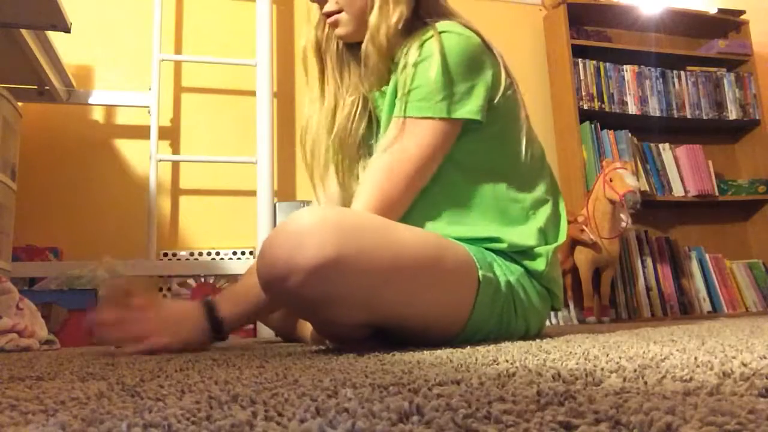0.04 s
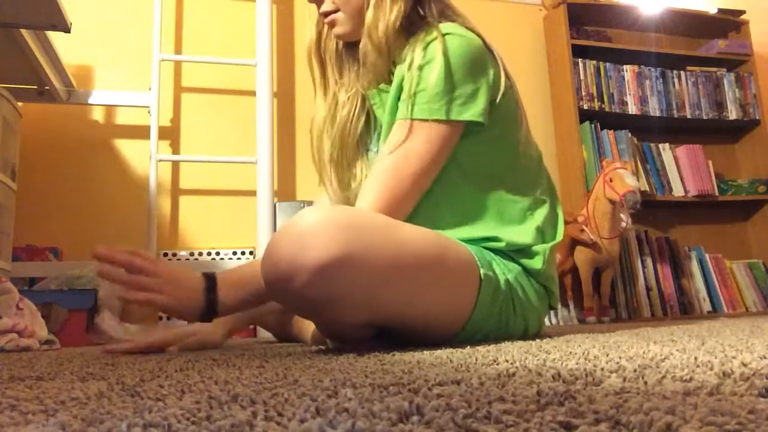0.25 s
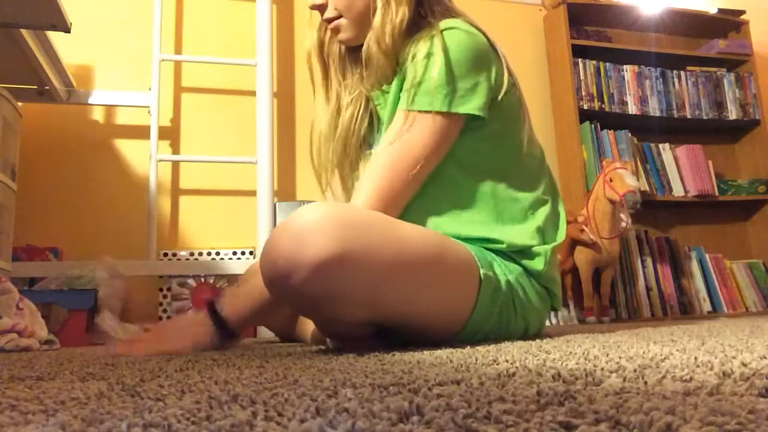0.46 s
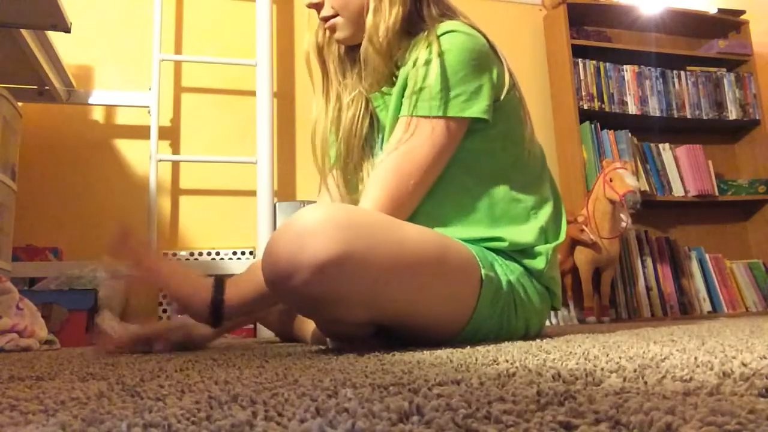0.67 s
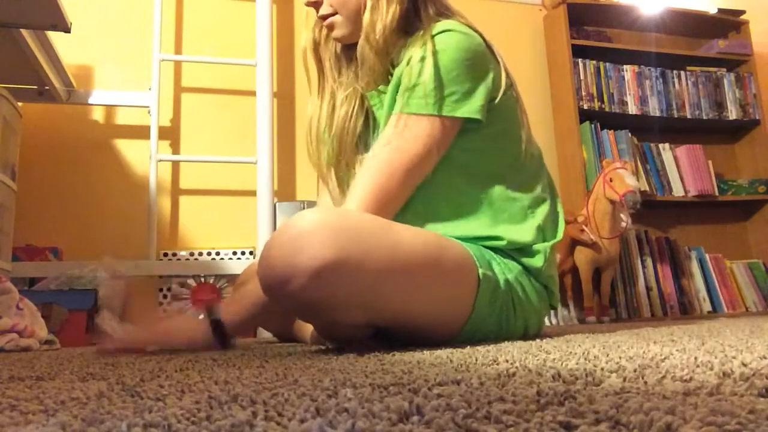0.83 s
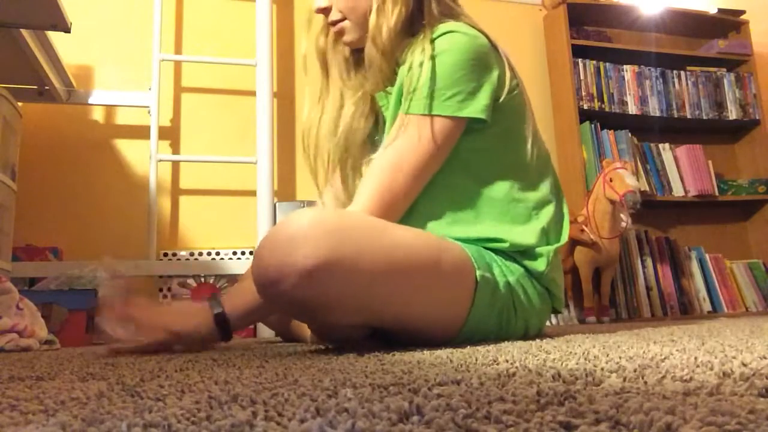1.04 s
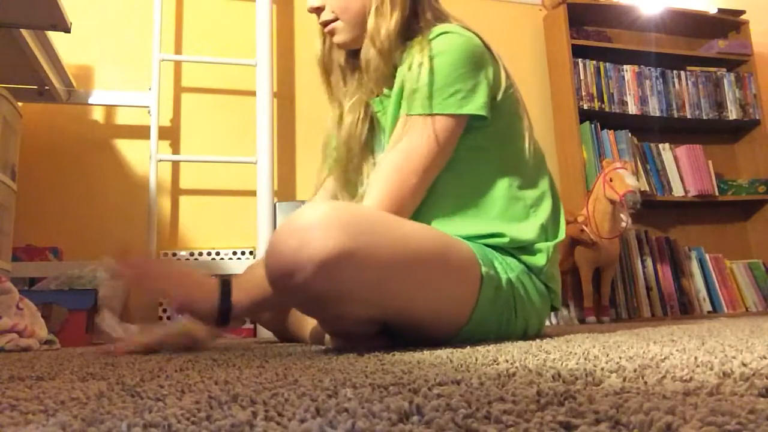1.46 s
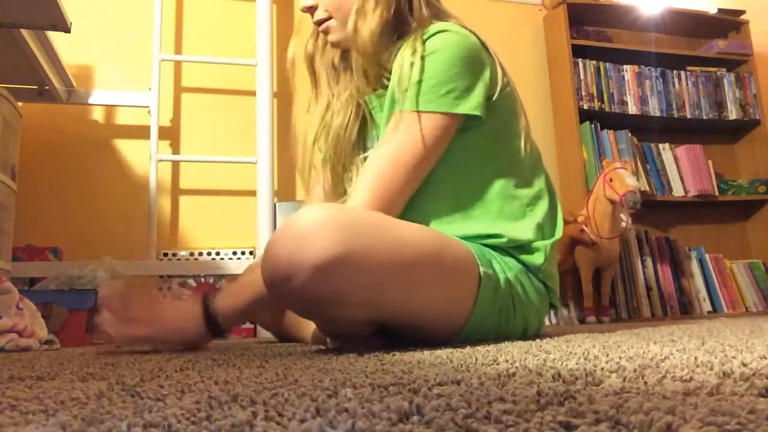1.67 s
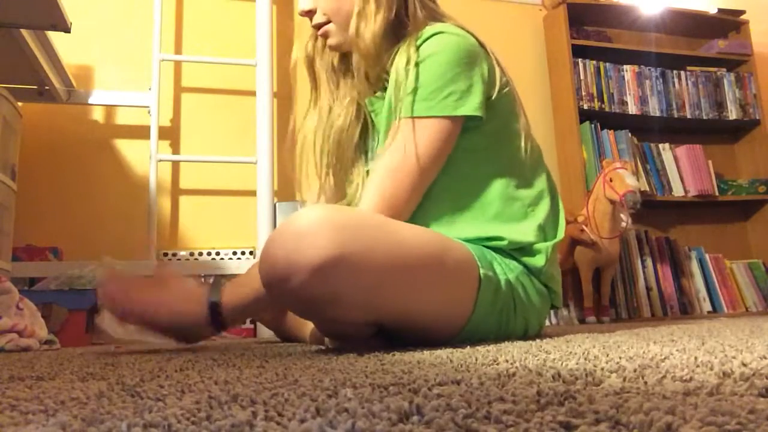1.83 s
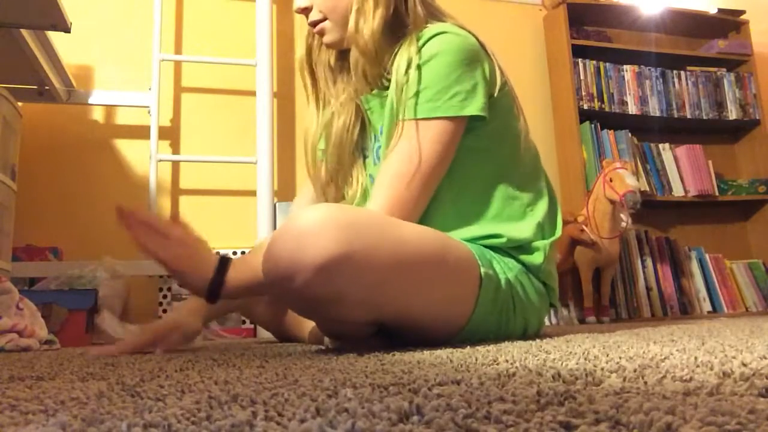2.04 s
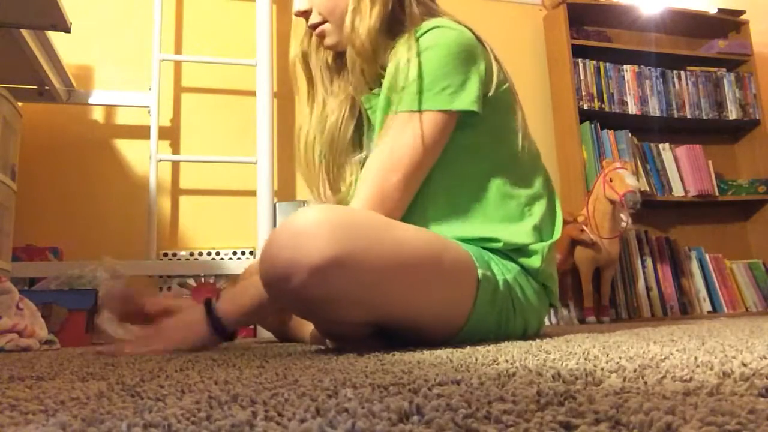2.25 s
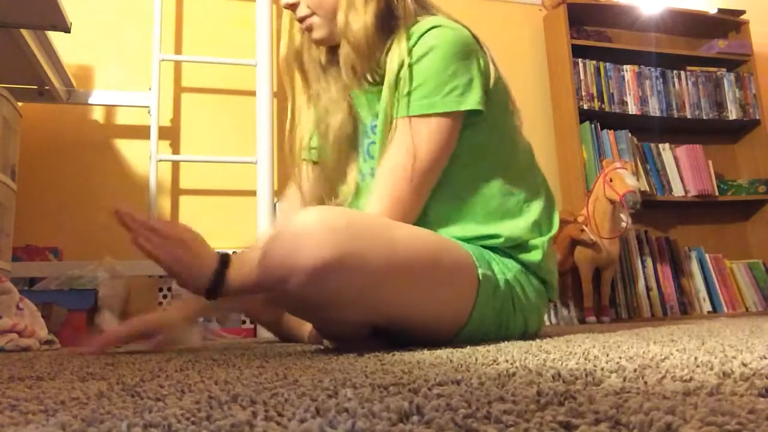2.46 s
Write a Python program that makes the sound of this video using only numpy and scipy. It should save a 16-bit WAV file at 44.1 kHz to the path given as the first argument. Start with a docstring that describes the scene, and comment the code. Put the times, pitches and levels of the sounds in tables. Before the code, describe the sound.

Quick, irregular hand pats thud softly on carpet, heard close up in a small room.

```python
"""Hands patting a carpeted floor

A small bedroom, microphone low down, close to two hands patting the carpet over a wooden floor.
The fingers slap down first, then each palm gives a dull thud, crunches the pile and sets the boards
booming. Walls and ceiling answer with short echoes over a faint room hum."""
import sys
import numpy as np
from scipy import signal
from scipy.fft import rfft, irfft
from scipy.io import wavfile
from scipy.ndimage import uniform_filter1d

SR = 44100
rng = np.random.default_rng(int(sys.argv[2]) if len(sys.argv) > 2 else 0)


def to_wav(sig):
    """Store sig (one row per channel, or 1-D mono) as 16-bit WAV at the path in sys.argv[1].

    Samples outside -1..1 are clipped; the rate is SR.
    """
    pcm = np.clip(np.atleast_2d(sig), -1, 1) * 32767
    pcm = np.round(pcm).astype(np.int16)
    wavfile.write(sys.argv[1], SR, pcm.T)  # frames by channels


N = 114660
T = np.arange(N) / SR

# Noise colours, as relative spectral density: frequency_hz, density_db
HUM_COLOUR = [(15, -31), (25, 1), (90, -3.5), (301, -1.5), (394, -6), (673, -18.5), (833, -21.5),
              (1210, -21.5), (1460, -21), (1670, -26), (2500, -31.5), (3010, -33), (4150, -34), (5570, -36),
              (7480, -34.5), (8550, -39), (15000, -44)]  # room hum
RUMBLE_COLOUR = [(25, -18.5), (45, -5.5), (62, 2), (80, -3), (110, -7.5), (200, -30.5)]  # deep rumble of the house
REVERB_COLOUR = [(40, -10.5), (120, -5.5), (250, -2), (500, 0), (1200, 1.5), (4000, 3), (12000, -1)]  # diffuse decay of the bedroom
CRUNCH_COLOUR = [(900, -19.5), (2000, 3.5), (3000, 0.5), (5000, -3.5), (7200, -1), (9000, -9.5),
                 (15000, -9)]  # pile pressed flat
BRUSH_COLOUR = [(600, -9.5), (1100, 5.5), (2000, 1), (5000, 0), (9000, -2.5), (15000, -5)]  # pile brushed
TICK_COLOUR = [(400, -13.5), (800, 6), (1200, 0.5), (1800, -6.5), (3000, -20.5), (8000, -27)]  # fingertip touching down
SMACK_COLOUR = [(280, -7.5), (370, 5), (520, 1), (700, 1.5), (900, -5), (1200, -7.5), (1500, -15.5),
                (1800, -19), (2400, -31.5), (4000, -52.5)]  # skin of the fingers
# Wall and ceiling reflections: delay_s, gain_db
WALL_ECHOES = [(.0087, -33.5), (0.0141, -20), (0.021, -15), (0.0302, -22.5), (0.0428, -33)]
# Resonances of something loose: pitch_hz, width_hz, level_db
RATTLE_BANDS = [(574, 200, -59.5), (1070, 160, -69), (2990, 770, -82)]
# A hand brushing the pile as it lifts: start_s, level_db
HAND_LIFTS = [(.155, -78), (.34, -79), (.585, -78.5), (1.409, -79.5), (1.572, -79), (1.735, -76.5),
              (2.385, -77)]
# Fingertips landing ahead of the hand: time_s, thud_db, tick_db
FINGERTIP_TOUCHES = [(0.0504, -29, -62), (0.1986, -32, -62.5), (0.5198, -43.5, -61.5), (.5535, -24, -53),
                     (0.7309, -33, -59.5), (.9245, -39.5, -58.5), (0.965, -24.5, -61.5),
                     (1.5478, -29.5, -53.5), (1.7125, -34.5, -60), (1.7996, -26.5, -51.5),
                     (1.8065, -19, -52.5), (1.9931, -39.5, -57), (2.142, -40.5, -60.5)]
# Small pockets of air under flat fingers: start_s, pitch_hz, level_db
FINGER_CLAPS = [(0.5509, 1116, -38), (1.1448, 1220, -38.5), (1.549, 1178, -43), (1.801, 892, -41.5),
                (1.9935, 793.6, -36.5)]
# Floorboard resonances: pitch_hz, gain_db, t60_s
BOARD_MODES = [(105.6, -27, 0.31), (149, -17.5, 0.16), (251, -20, 0.19)]
# Hands landing: time_s, palm_db, contact_ms, heel_db, air_db,
# slap_db, finger_lead_ms, slap_pitch_hz, smack_db, crunch_db
HAND_PATS = [(0.0557, -9.5, 1.035, -29.5, -41.5, -18.5, 3.0, 381, -44, -67.5),
             (0.1992, -22.5, 1.9, -22, -48, -44.5, 2.8, 514, -50.5, -80),
             (0.2103, -21.5, 1.22, -31.5, -27, -37, 4, 486, -64, -81),
             (0.333, -18.5, 1.74, -27, -44.5, -39, 3.83, 478, -48.5, -72.5),
             (0.526, -16, 1.3, -30, -43.5, -40, 2.92, 377.4, -59, -77),
             (0.557, -9.5, 1.43, -17, -31.5, -15, 4.62, 492.6, -41.5, -65),
             (0.7373, -18, 1.63, -26.5, -48, -44.5, 2.38, 553, -56.5, -78),
             (0.9295, -23, 1, -32, -35, -28, 5.1, 347.0, -54, -73),
             (0.9712, -7.5, 1.64, -15, -34.5, -20, 4.1, 491.0, -46, -74.5),
             (1.1518, -8, 1.117, -24, -43, -22.0, 4.8, 504, -38.0, -70.5),
             (1.3197, -30, 1.28, -42.5, -49.5, -52, 1.6, 740, -71, -77.5),
             (1.396, -14.5, 1.44, -22, -48.5, -23.5, 3.12, 468, -45, -70),
             (1.4031, -17, 1.17, -23.5, -47, -34.5, 3.07, 465, -59, -74.5),
             (1.5551, -13, 1.144, -19.5, -24, -31.5, 4.23, 616, -46.5, -68),
             (1.7177, -10.5, 1.43, -21, -35.5, -30.5, 3.98, 430, -53.5, -72.0),
             (1.8112, -11, 1.53, -22, -46.5, -17, 6.5, 449, -42, -66.5),
             (1.9989, -8.5, 1.42, -20.0, -31, -24, 3.87, 474, -44.5, -67.5),
             (2.1474, -15, 1.46, -24.5, -43, -37.5, 3.51, 378, -57.5, -78.5),
             (2.3233, -10.5, 1.34, -25, -45, -24.0, 3.22, 436, -45.5, -69.5),
             (2.5683, -36.5, 1.53, -44, -61, -57.5, 4.4, 580, -61, -81)]


def from_db(db):
    """Decibels to gain."""
    return 10 ** (np.asarray(db) / 20)


def noise(colour):
    """Noise of the given colour, rms 1."""
    hz, db = np.transpose(colour)
    bins_hz = np.maximum(np.arange(N // 2 + 1) * SR / N, 1)
    gain = from_db(np.interp(np.log(bins_hz), np.log(hz), db))
    x = irfft(rfft(rng.standard_normal(N)) * gain, N)
    return x / x.std()


def swell(start_s, rise_s):
    """Rounded attack that peaks after twice the rise time, then an exponential release."""
    u = np.clip((T - start_s) / rise_s, 0, 100)
    return (u * np.e / 2) ** 2 * np.exp(-u)


def contact(time_s, width_s):
    """A soft contact: a bell-shaped force, and the pressure that its acceleration radiates."""
    u2 = np.minimum(((T - time_s) / width_s) ** 2, 200)
    force = np.exp(-u2 / 2)
    return force / force.sum(), (u2 - 1) * force


def ring(force, hz, t60_s):
    """One resonance: a unit impulse sets a sine of height 1 ringing down."""
    r, w = np.exp(-np.log(1000) / (t60_s * SR)), 2 * np.pi * hz / SR
    return signal.lfilter([0, np.sin(w)], [1, -2 * r * np.cos(w), r * r], force + 1e-18)


def room_tone():
    """Far behind the hands, the steady hum of the room and rumble of the house."""
    return from_db(-62) * (noise(HUM_COLOUR) + noise(RUMBLE_COLOUR + [(1000, -90.5)]))


def bedroom(direct, echo_cut_hz=7100, onset_s=0.0023):
    """Nearby walls and ceiling return dull echoes, then a quick diffuse decay with a weak longer tail."""
    dull = signal.sosfilt(signal.butter(1, echo_cut_hz, fs=SR, output="sos"), direct)
    echoes = sum(from_db(db) * np.interp(T - delay, T, dull, left=0) for delay, db in WALL_ECHOES)
    response = np.zeros(N)
    for db, t60_s in ((-20, 0.3), (-31, 0.98)):
        decay = np.exp(-np.log(1000) * T / t60_s) * np.clip(T / onset_s - 1, 0, 1)
        response += from_db(db) * noise(REVERB_COLOUR) * decay / np.sqrt(np.sum(decay ** 2))
    return echoes + signal.fftconvolve(direct, response)[:N]


def rattle():
    """Something loose in the room buzzes faintly, once, in a few broad resonances."""
    buzz = np.zeros(N)
    for hz, width_hz, db in RATTLE_BANDS:
        b, a = signal.iirpeak(hz, hz / width_hz, fs=SR)
        band = signal.lfilter(b, a, signal.lfilter(b, a, rng.standard_normal(N)))
        buzz += from_db(db) * band / band.std()
    return buzz * swell(start_s=0.8745, rise_s=0.048)


def fibres(colour, grain_db=2.5):
    """Grainy noise of carpet fibres, rms 1."""
    grain = uniform_filter1d(rng.standard_normal(N), size=25)
    x = noise(colour) * from_db(grain_db * grain / grain.std())
    return x / x.std()


def pile(lead_s=0.009):
    """Heard close up, fibres crunch as they are pressed flat and rustle as a hand leaves."""
    pressed = sum(from_db(db) * swell(s - lead_s, rise_s=0.0046) for s, *_, db in HAND_PATS)
    brushed = sum(from_db(db) * swell(s, rise_s=0.0087) for s, db in HAND_LIFTS)
    return pressed * fibres(CRUNCH_COLOUR) + brushed * fibres(BRUSH_COLOUR)


def fingertips(tick_lead_s=0.0015):
    """Each fingertip lands with a tiny thud and a dry tick."""
    thuds = sum(from_db(db) * contact(s, width_s=0.00067)[1] for s, db, _ in FINGERTIP_TOUCHES)
    ticks = sum(from_db(db) * swell(s - tick_lead_s, rise_s=0.0009) for s, _, db in FINGERTIP_TOUCHES)
    return thuds + ticks * noise(TICK_COLOUR)


def claps():
    """On some firm pats, flat fingers trap a smaller pocket of air: a brief higher note."""
    return sum(from_db(db) * swell(s, rise_s=0.001) * np.sin(2 * np.pi * hz * (T - s))
               for s, hz, db in FINGER_CLAPS)


def fingers(slap_rise_s=0.0012, smack_lead_s=0.0025):
    """The fingers land before the palm: skin smacks and a cupped pocket of air rings a few cycles."""
    slap, smack = np.zeros((2, N))
    for s, *_, slap_db, lead_ms, hz, smack_db, _ in HAND_PATS:
        land_s = s - lead_ms / 1000
        air_note = np.cos(2 * np.pi * hz * (T - land_s))
        slap += from_db(slap_db) * swell(land_s - 2 * slap_rise_s, slap_rise_s) * air_note
        smack += from_db(smack_db) * swell(land_s - smack_lead_s, rise_s=0.0021)
    return slap + smack * noise(SMACK_COLOUR)


def palms(air_lead_s=0.00033, puff_gain_db=-3, heel_lag_s=0.00517):
    """Squeezed air sets the joists booming, the palm thuds and rings the boards, the soft heel settles."""
    thud, force, squeeze = np.zeros((3, N))
    for s, palm_db, contact_ms, heel_db, air_db, *_ in HAND_PATS:
        air_push, air_puff = contact(s - air_lead_s, width_s=0.0031)
        palm_push, palm_thud = contact(s, contact_ms / 1000)
        _, heel_thud = contact(s + heel_lag_s, width_s=0.0028)
        squeeze += from_db(air_db) * air_push
        force += from_db(palm_db) * palm_push
        thud += from_db(palm_db) * palm_thud + from_db(heel_db) * heel_thud
        thud += from_db(air_db + puff_gain_db) * air_puff
    joists = from_db(-12.5) * ring(squeeze, hz=57.5, t60_s=0.15)
    boards = sum(from_db(db) * ring(force, hz, t60_s) for hz, db, t60_s in BOARD_MODES)
    return thud + joists + boards


def scene():
    """At the microphone, in mono: the pats up close, the bedroom's reply and room tone behind."""
    direct = palms() + fingertips() + fingers() + claps() + pile() + rattle()
    return (room_tone() + direct + bedroom(direct))[None]


def record(dry, low_cut_hz=43, high_cut_hz=15300):
    """Microphone chain: a zero-phase low cut that keeps the thuds tight, then a steep top cut."""
    low_cut = signal.butter(3, low_cut_hz, "high", fs=SR, output="sos")
    high_cut = signal.ellip(10, .1, 80, high_cut_hz, fs=SR, output="sos")
    return signal.sosfilt(high_cut, signal.sosfiltfilt(low_cut, dry, padtype="even"))


dry = scene()
out = record(dry)
to_wav(out)
```